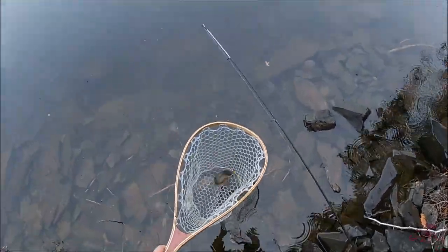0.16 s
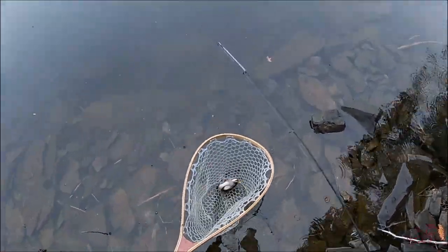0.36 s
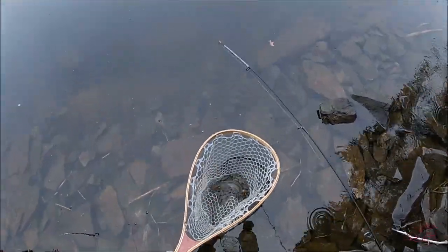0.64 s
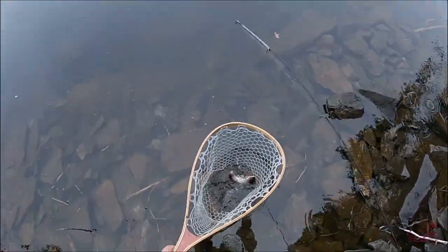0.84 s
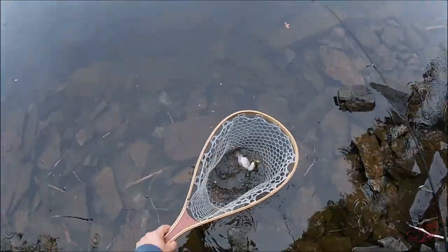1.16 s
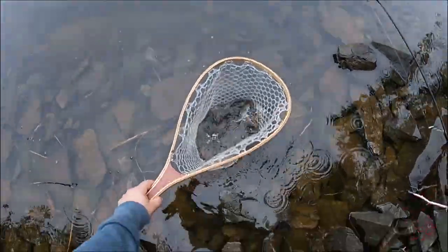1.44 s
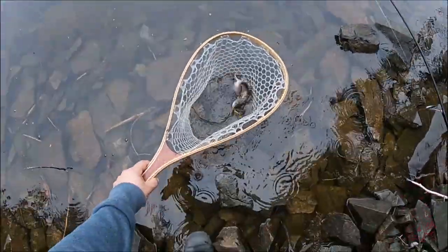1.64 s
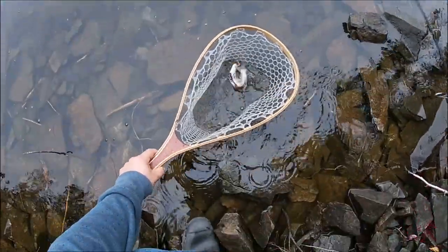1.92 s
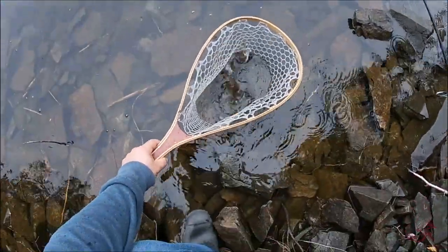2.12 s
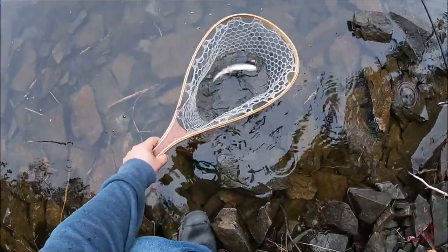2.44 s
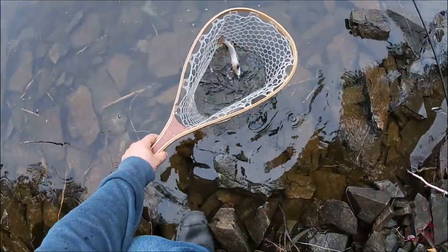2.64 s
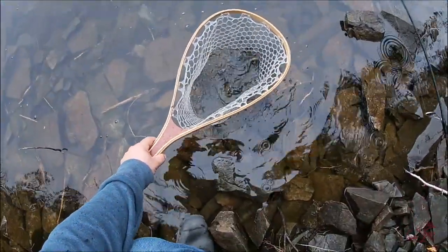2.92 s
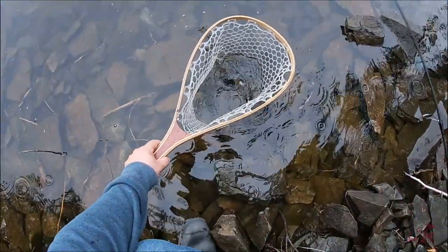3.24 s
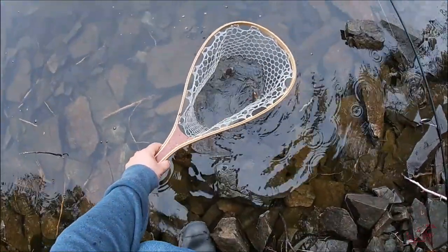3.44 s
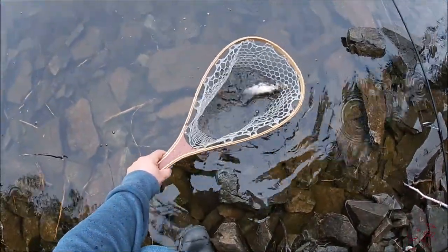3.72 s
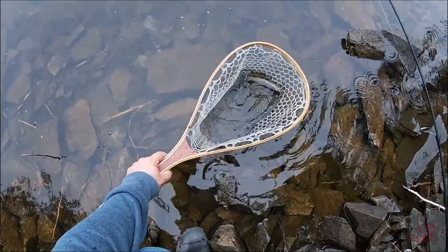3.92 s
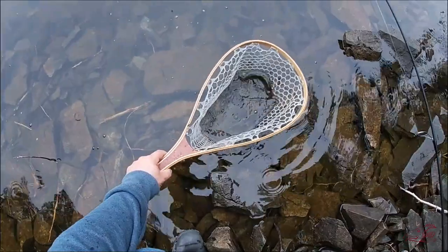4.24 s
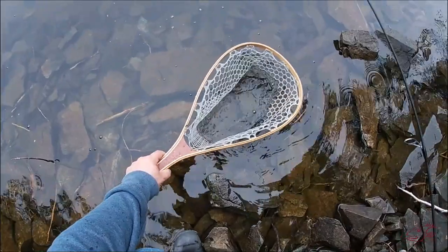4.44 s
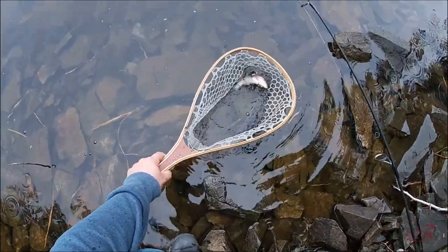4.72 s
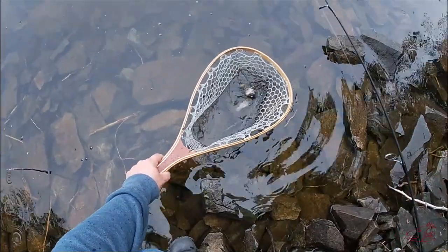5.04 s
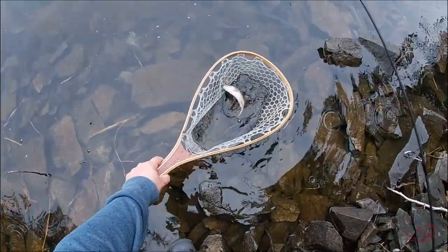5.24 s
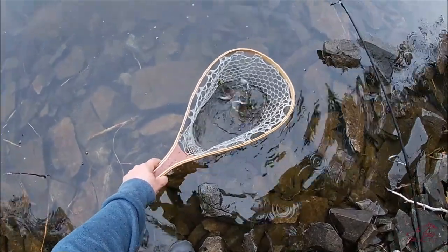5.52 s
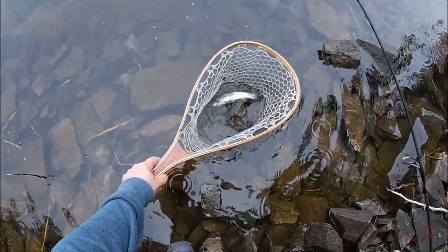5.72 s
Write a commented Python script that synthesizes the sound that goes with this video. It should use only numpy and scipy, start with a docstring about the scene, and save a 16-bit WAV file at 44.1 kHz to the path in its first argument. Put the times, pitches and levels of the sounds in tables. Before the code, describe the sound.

Gear knocks and clothing rustles briefly against a body-worn microphone at a lake shore. Close by, a little fish wriggles in a net in shallow water, making light, uneven splashes, drips, bubbles and small gurgles. The splashing eases for a moment, then returns with a sharp wet slap and a last flurry. Faint wind touches the microphone early on, over a quiet, steady rush far away.

```python
"""At the shallow edge of a lake, a small fish flaps in a landing net, heard in mono by a body-worn camera.
Each flap throws a fizz of spray, drops tick on the surface, trapped bubbles ring and glide,
and air pockets gurgle upward. At first the gear knocks and cloth rubs;
wind puffs on the microphone over a distant steady rush."""
import sys
import numpy as np
from scipy import signal
from scipy.fft import rfft, irfft
from scipy.io import wavfile
from scipy.ndimage import uniform_filter1d

SR = 44100
rng = np.random.default_rng(int(sys.argv[2]) if len(sys.argv) > 2 else 0)


def digitize_waveform(pressure):
    """Quantize a signal to 16-bit integers and store it at the path in sys.argv[1].

    Rows of a 2-D input are taken as channels; values are limited to [-1, 1].
    """
    field = np.atleast_2d(pressure).T
    bounded = np.clip(field, -1, 1)
    quanta = np.round(bounded * 32767).astype(np.int16)
    wavfile.write(sys.argv[1], SR, quanta)


N = 258939


def undb(db):
    """Decibels to gain."""
    return 10 ** (np.asarray(db, float) / 20)


def unit(x):
    """Scale to rms 1."""
    return x / np.sqrt(np.mean(x ** 2))


def fader(rows, column=1):
    """Gain over time from one level column of (time [s], level [dB], ...) rows."""
    columns = np.transpose(rows)
    return undb(np.interp(np.arange(N) / SR, columns[0], columns[column]))


def colour(x, tone):
    """Minimum-phase EQ through (frequency [Hz], gain [dB]) points."""
    hz, db = np.transpose(tone)
    log_hz = np.log(np.maximum(np.arange(2049) * SR / 4096, 1))
    cepstrum = irfft(np.log(undb(np.interp(log_hz, np.log(hz), db))))
    cepstrum[1:2048] *= 2  # folding makes the filter causal
    cepstrum[2049:] = 0
    return signal.fftconvolve(x, irfft(np.exp(rfft(cepstrum))))[:len(x)]


def walk(rate_hz):
    """Modulator that slides between random values; spread near 1."""
    step = int(SR / rate_hz)
    return uniform_filter1d(np.repeat(rng.standard_normal(N // step + 1), step), step)[:N]


def add(out, s, sound):
    """Mix a short sound in at time s."""
    i = int(s * SR)
    out[i:i + len(sound)] += sound[:len(out) - i]


def impact(hz, ms, width, tail_db=-20, wide_db=-19):
    """One hit: a noise spurt in a resonance, a weak wideband snap and a faint tail; peak 1."""
    t_ms = np.arange(2048) * 1000 / SR
    decay = np.exp(-1.2 * t_ms / ms) + undb(tail_db) * np.exp(-t_ms / 7)
    spurt = decay * (1 - np.exp(-t_ms / .4)) * rng.standard_normal(len(t_ms))
    spurt[8] += 4.5  # first contact is one sharp push
    band_hz = np.clip([hz / (1 + width), hz * (1 + width)], 30, SR / 2.2)
    body = signal.lfilter(*signal.butter(2, band_hz, "bandpass", fs=SR), spurt)
    hit = body + undb(wide_db) * np.diff(spurt, prepend=0)
    return hit / np.abs(hit).max()


def ring(hz, ms, glide, attack_ms=0.13):
    """One rising bubble: a fading sine that bends by `glide` octaves per ring time `ms`."""
    age = np.arange(int(3 * ms * SR / 1000) + 8) * 1000 / SR / ms  # in ring times
    wobble = np.interp(age * ms / 2.5, np.arange(128), rng.standard_normal(128))
    steep = max(glide - .45, 0)  # a steep climber holds its level, then pops
    climb_oct = glide * np.minimum(age, 2.2 - 2 * steep)  # ends at the surface
    pitch_hz = np.minimum(hz * 2 ** climb_oct * (1 + .04 * wobble), SR / 3)
    envelope = np.exp(-1.4 * age ** (1 + 13 * steep)) * (1 - np.exp(-age * ms / attack_ms))
    flutter = 1 + min(.15 + ms / 90, .7) * wobble[::-1]  # long rings break up
    return np.sin(2 * np.pi * np.cumsum(pitch_hz) / SR) * envelope * flutter


def droplets(n, centre_hz, per_s, spread_oct, scatter_db=15):
    """A fizz of tiny bubbles, each a few cycles long; the lower-pitched ones are fainter."""
    fizz = np.zeros(n)
    count = int(n * per_s / SR)
    for (when, length, size), pitch in zip(rng.random((count, 3)), rng.standard_normal(count)):
        hz = min(centre_hz * 2 ** (spread_oct * pitch), 14000)
        cycles = np.arange(int(4 * (3.3 + 6 * length) * SR / hz)) * hz / SR
        envelope = np.exp(-1.4 * cycles / (4.3 + 6 * length)) * (1 - np.exp(-cycles / 0.32))
        gain = undb(scatter_db * size ** 2 + 3 * pitch)
        add(fizz, when * n / SR, gain * envelope * np.sin(2 * np.pi * cycles))
    return unit(fizz)


def distant_rush():
    """The bed: a far, gently wavering wash of noise over a low drone and a murmur just above it."""
    # fader of the wash: (time [s], level [dB])
    wash_levels = [(0, -49), (.5, -52.5), (1.5, -56.5), (3.5, -56.5), (4.3, -57.5), (5.87, -59.5)]
    # spectrum of the wash: (frequency [Hz], relative level [dB])
    wash_tone = [(230, -15.5), (340, -11), (550, -5.5), (750, -2), (1000, 1), (1400, -3.5), (2200, -14),
                 (4000, -23.5), (7500, -23), (15000, -36)]
    # faders of the low end: (time [s], drone level [dB], murmur level [dB])
    low_levels = [(0, -55, -65), (.28, -65, -50), (.5, -65, -62), (.8, -65, -54.5), (1.15, -59.5, -66.5),
                  (2.5, -61, -71), (3.8, -63.5, -71), (4.3, -66.5, -70), (4.7, -67, -60),
                  (5.05, -69, -68.5), (5.87, -61.5, -66.5)]
    # spectrum of the drone: (frequency [Hz], relative level [dB])
    drone_tone = [(35, -16), (75, -10), (112, -21.5), (135, -9), (145, -4), (156, -10), (200, -13.5),
                  (300, -39)]
    wash = unit(colour(rng.standard_normal(N), wash_tone)) * undb(2.2 * walk(12))
    drone = unit(colour(rng.standard_normal(N), drone_tone)) * undb(1.5 * walk(7))
    murmur_band = signal.butter(2, [165, 280], "bandpass", fs=SR, output="sos")
    murmur = unit(signal.sosfilt(murmur_band, rng.standard_normal(N)))
    return wash * fader(wash_levels) + drone * fader(low_levels) + murmur * fader(low_levels, column=2)


def wind():
    """Turbulence at the microphone port: deep gusts over a breeze that dies down."""
    # gusts on the microphone: (peak time [s], level [dB])
    puffs = [(.29, -48.5), (1.4, -42.5), (1.8, -61), (3.1, -62)]
    rumble_tone = [(8, -1.5), (22, 1), (45, -13.5), (100, -18), (300, -54), (2000, -109)]
    rumble = unit(colour(rng.standard_normal(N), rumble_tone) * undb(0.98 * walk(9)))
    t = np.arange(N) / SR
    gusts = sum(undb(db) * np.exp(-((t - s) / 0.073) ** 2) for s, db in puffs)
    breeze = undb(-60.5 - 2 * t)
    return rumble * (gusts + breeze)


def cloth_rub():
    """Grainy friction of cloth: one quick stroke over a quiet rustle that soon fades."""
    grain = rng.standard_normal(N) * undb(2.1 * walk(251.7))
    rub = unit(colour(grain, [(100, 3.5), (700, 4.5), (2100, 0.0), (3500, -10.5), (9000, -28.5)]))
    t = np.arange(N) / SR
    corners_s = np.cumsum([0.1783, 0.018, 0.023, 0.028])  # start, rise, hold, fall
    stroke = undb(-36.5) * np.interp(t, corners_s, [0, 1, 1, 0]) ** 2
    rustle = undb(-53) * np.clip(2 - 2 * t / 0.38, 0, 1)
    return rub * (stroke + rustle)


def knocks():
    """Dull impacts: gear knocks on the camera mount, the fish thumps the water."""
    # knocks and thumps: (time [s], peak [dB], centre [Hz], length [ms])
    hits = [(0.0609, -21, 836, 5.1), (0.073, -34, 794, 3.9), (.083, -27.5, 870, 3.4),
            (.153, -28.5, 910, 12), (.161, -19, 760, 3.8), (.169, -33.5, 780, 5.6), (4.689, -38, 544, 1.1),
            (4.918, -40, 434, 1.4), (5.1905, -27, 615, 1.83)]
    out = np.zeros(N)
    for s, db, hz, ms in hits:
        add(out, s, undb(db) * impact(hz, ms, width=0.51, tail_db=-24, wide_db=-44))
    return out


def spray():
    """Showers of droplets over a thin hiss; between them the wet mesh keeps up a faint high patter."""
    # one shower per flap or lift of the net: (time [s], length [ms], level [dB])
    showers = [(.27, 190, -60), (.386, 50, -48.5), (.453, 73, -57.5), (.585, 107, -55.5), (.7, 90, -66.5),
               (.809, 188, -57.5), (1.066, 34, -58), (1.208, 99, -60), (1.399, 102, -49.5),
               (1.504, 89, -55.5), (1.679, 151, -52), (1.959, 99, -50.5), (2.084, 110, -55.5),
               (2.175, 124, -51.5), (2.311, 140, -55.5), (2.53, 185, -55.5), (2.68, 100, -59.5),
               (2.746, 150, -51.5), (2.891, 97, -55), (2.982, 53, -54), (3.05, 203, -54),
               (3.227, 108, -53.5), (3.526, 118, -51.5), (3.715, 24, -54), (3.772, 110, -55),
               (3.885, 117, -55.5), (4.339, 116, -64), (4.629, 125, -60.5), (4.691, 34, -48.5),
               (4.731, 78, -61), (4.85, 123, -55), (5.042, 170, -60.5), (5.319, 200, -61),
               (5.501, 136, -56), (5.61, 130, -51), (5.749, 77, -61.5)]
    out = undb(-71.5) * droplets(N, centre_hz=5920, per_s=80, spread_oct=0.46)
    out += undb(-80) * droplets(N, centre_hz=11200, per_s=210, spread_oct=0.26)
    spray_hz = 4060
    hiss_band = signal.butter(1, [spray_hz / 4.5, spray_hz * 1.07], "bandpass", fs=SR)
    for s, ms, db in showers:
        age = np.arange(0, 1.5, 1000 / ms / SR)  # in shower lengths
        n = len(age)
        hiss = signal.lfilter(*hiss_band, rng.standard_normal(n))
        mist = np.diff(rng.standard_normal(n + 2), 2) * undb(9 * walk(153)[:n])  # finest spray, all treble
        fizz = droplets(n, spray_hz, per_s=800, spread_oct=0.81)
        swell = np.minimum(age / 0.1, 1) * np.exp(-1.2 * age ** 3)
        add(out, s, undb(db) * swell * (fizz + undb(-5.5) * unit(hiss) + undb(-2.0) * unit(mist)))
    return out


def drop_ticks():
    """Water strikes the surface with a tick and a faint splatter; the briefer, the wider its band."""
    # drops and slaps: (time [s], peak [dB], centre [Hz], length [ms])
    ticks = [(.4017, -31, 4330, 1.8), (0.4224, -37.5, 4000, 3.1), (.461, -35.5, 3200, 1.7),
             (.9098, -25.5, 3450, 3.1), (0.9283, -26.5, 4620, 1.4), (1.0758, -28.5, 4320, 2.2),
             (1.2176, -29, 5350, 5.8), (1.415, -33.5, 3030, 5.7), (1.4524, -21, 5650, 1.7),
             (1.4944, -29.5, 2450, 3.3), (2.0028, -29.5, 3550, 5.6), (2.129, -34, 5400, 3.3),
             (2.207, -27.5, 3660, 2.3), (2.2272, -30.5, 2490, 4), (2.2577, -37.5, 5440, 5.7),
             (2.577, -26.5, 3250, 1.8), (2.6424, -34.5, 3000, 3.9), (2.7792, -23, 7200, 2.4),
             (2.796, -18, 4250, 0.38), (2.8298, -24, 3760, 1.2), (2.848, -26.5, 3000, 3.3),
             (2.9285, -24.5, 5200, .9), (2.991, -35, 3570, 4.4), (2.989, -22, 7500, 1.1),
             (3.064, -28, 4550, 3), (3.206, -35.5, 5670, 6.1), (3.55, -23.5, 3500, .7),
             (3.5746, -27.5, 3800, 1), (3.6045, -36.5, 4300, 2.9), (3.722, -31, 6350, 0.83),
             (3.863, -28.5, 5350, .45), (3.9469, -31, 6160, 2.5), (4.192, -40, 6450, 2.4),
             (4.6884, -6.5, 2640, 0.85), (4.6903, -11.5, 7200, 1.4), (4.6913, -17, 5040, 0.73),
             (4.937, -34.5, 7300, 2.7), (5.047, -36.5, 6600, 8), (5.048, -40, 13000, 1.1),
             (5.069, -38, 6360, 5.3), (5.5043, -21, 4080, 2.95), (5.505, -16.5, 9900, 1.3),
             (5.5803, -18.5, 4730, 1.54), (5.6189, -35, 5600, .9), (5.636, -38, 5000, 1.5),
             (5.684, -23, 3750, 2.7)]
    out = np.zeros(N)
    for s, db, hz, ms in ticks:
        add(out, s, undb(db) * impact(hz, ms, width=0.79 / ms))
    return out


def bubbles():
    """Trapped air pinches off with a click and rings; long rings bend up, brief ones sag a little."""
    # bubbles under the surface: (time [s], start pitch [Hz], level [dB], ring time [ms])
    plinks = [(.815, 655, -39.5, 6), (0.8723, 3650, -42, 6.6), (.891, 3270, -33, 4.6),
              (.9097, 4000, -38, 2), (0.93, 3800, -38, 3.2), (.953, 3780, -42, 3.8),
              (.9657, 3270, -38.5, 5), (1.2379, 2850, -30, 8.8), (1.277, 1920, -38.5, 5.8),
              (1.452, 2550, -35, 7), (1.587, 191, -41.5, 23), (1.628, 463, -41.5, 14),
              (1.7246, 1340, -37.5, 13), (1.831, 2650, -40, 3.7), (1.968, 1930, -38, 3.2),
              (1.9729, 2540, -38.5, 4), (2.0962, 3650, -41, 3.5), (2.183, 1940, -35, 6.2),
              (2.227, 1360, -34, 10), (2.2287, 2120, -26.5, 4.8), (2.26, 1790, -36.5, 7.5),
              (2.268, 680, -41.5, 10.7), (2.322, 730, -39, 13), (2.441, 2740, -30, 3.5),
              (2.4738, 3300, -35.5, 2.8), (2.545, 2800, -39, 3.3), (2.559, 2400, -39, 7.8),
              (2.5698, 2310, -36, 8.4), (2.5782, 1646, -24.5, 4.7), (2.635, 4120, -31.5, 2.5),
              (2.7497, 2730, -36.5, 5.7), (2.7923, 1475, -30, 7.2), (2.7948, 1890, -31.5, 5.6),
              (2.803, 628, -44.5, 25), (3.072, 2390, -23, 7), (3.1777, 3120, -35, 6.9),
              (3.196, 924, -33.5, 17), (3.2423, 2040, -39.5, 11), (3.2688, 2250, -40.5, 6.4),
              (3.44, 3330, -44.5, 5.1), (3.537, 2010, -37, 4), (3.55, 1500, -28.5, 14.2),
              (3.5764, 3440, -32, 2.6), (3.607, 2950, -36, 7.3), (3.638, 3270, -39.5, 4),
              (3.7168, 1380, -35, 21.3), (3.9082, 3140, -35.5, 6.4), (3.939, 1750, -34.5, 1.7),
              (4.3769, 3190, -41.5, 4.8), (4.402, 1960, -35.5, 3.1), (4.6894, 860, -28.5, 4.8),
              (5.0525, 2240, -37, 6.1), (5.054, 1340, -36.5, 10.5), (5.149, 3400, -39, 3.2),
              (5.1905, 1305, -24.5, 2.2), (5.192, 306, -31.5, 11), (5.2305, 3780, -44, 4.1),
              (5.339, 2340, -40, 5.7), (5.407, 1640, -41.5, 9.3), (5.556, 2940, -36.5, 2.1),
              (5.581, 1310, -29.5, 16.2), (5.645, 2390, -35, 6.1), (5.6812, 3570, -31.5, 4.4),
              (5.6847, 1830, -31.5, 5.7), (5.7535, 1374, -36.5, 15.7), (5.755, 1980, -31, 5.7),
              (5.793, 3560, -44, 5)]
    steady_ms, click_db = 5.5, -13.5
    out = np.zeros(N)
    for s, hz, db, ms in plinks:
        add(out, s, undb(db) * ring(hz, ms, glide=min(0.023 * (ms - steady_ms), .22)))
        add(out, s, undb(db + click_db) * impact(hz=4840, ms=0.9, width=1.04))
    return out


def gurgles():
    """Air pockets climb to the surface, sweep up about an octave and pop."""
    # air pockets: (time [s], start pitch [Hz], level [dB], ring time [ms])
    pockets = [(1.073, 1280, -38.5, 12.6), (1.148, 611, -45.5, 44), (1.409, 1520, -46, 14.6),
               (2.2078, 1300, -29.5, 8.8), (3.105, 489, -52.5, 96)]
    out = np.zeros(N)
    for s, hz, db, ms in pockets:
        add(out, s, undb(db) * ring(hz, ms, glide=0.96))
    return out


def scene():
    """Water up front, gear and air around it, all at one microphone."""
    water = drop_ticks() + bubbles() + gurgles() + spray()
    mono = water + knocks() + cloth_rub() + wind() + distant_rush()
    return np.array([mono, mono])


def record(dry):
    """The port colours the treble and the top is cut steeply; both sides carry the one microphone."""
    # response of the microphone behind its port: (frequency [Hz], gain [dB])
    port_tone = [(20, 5), (6300, 0.5), (7300, 2.5), (8000, -1.5), (8700, -11.5), (9700, -4), (12000, -17),
                 (14500, -17), (16500, -73)]
    high_cut = signal.ellip(8, .2, 70, 16300, fs=SR, output="sos")
    heard = signal.sosfilt(high_cut, colour(dry[0], port_tone))
    return np.array([heard, heard])


dry = scene()
out = record(dry)
digitize_waveform(out)
```